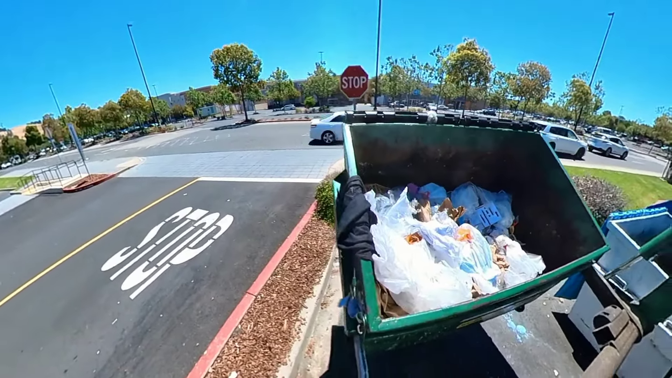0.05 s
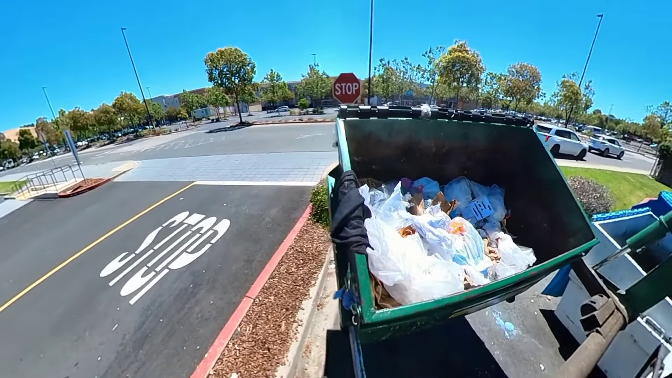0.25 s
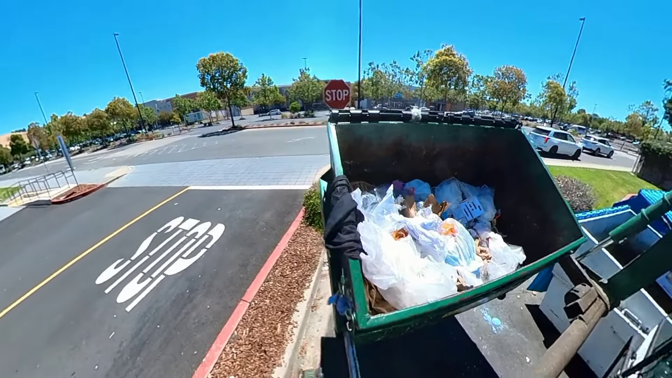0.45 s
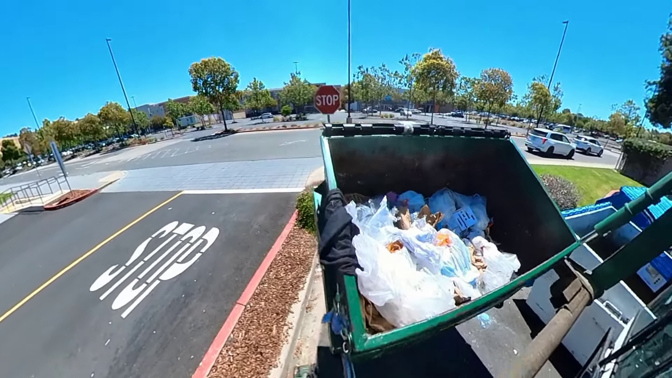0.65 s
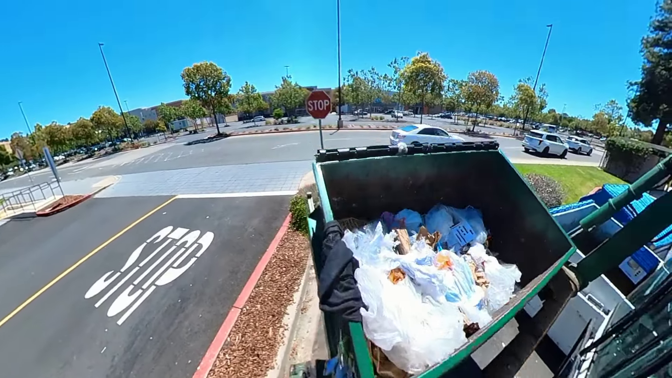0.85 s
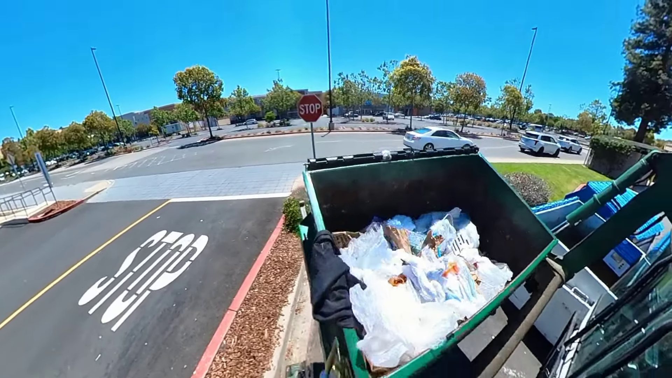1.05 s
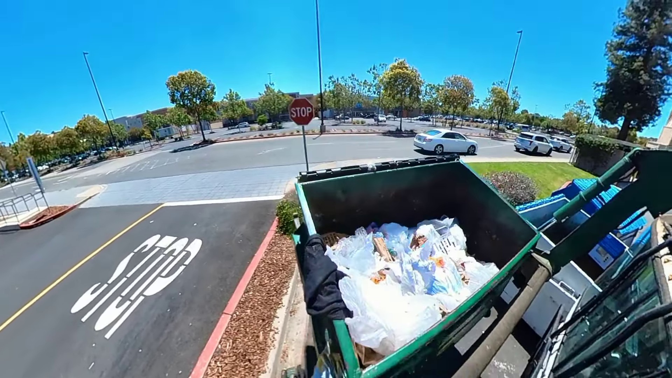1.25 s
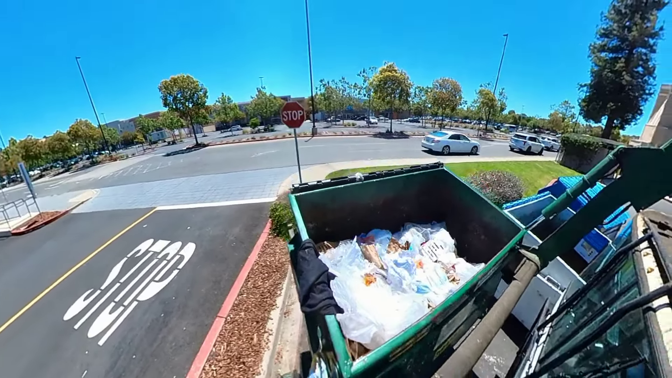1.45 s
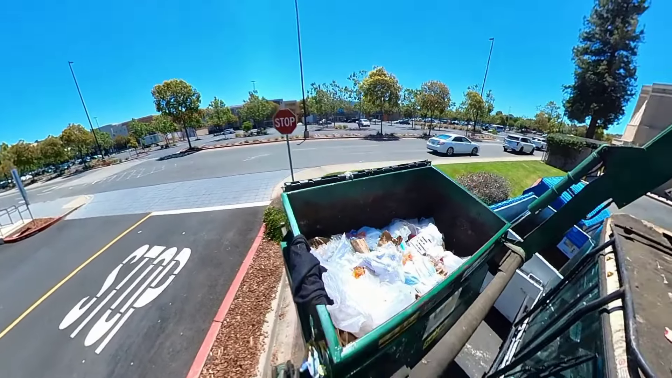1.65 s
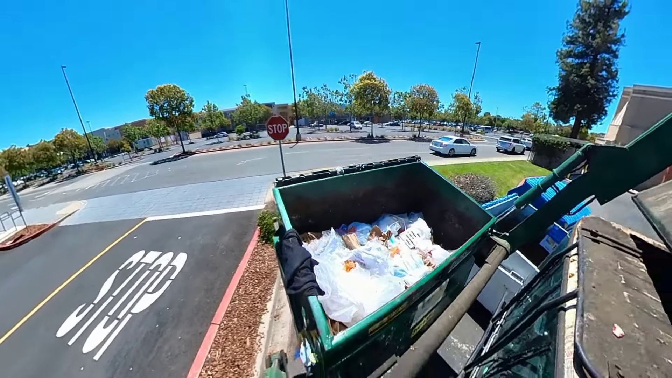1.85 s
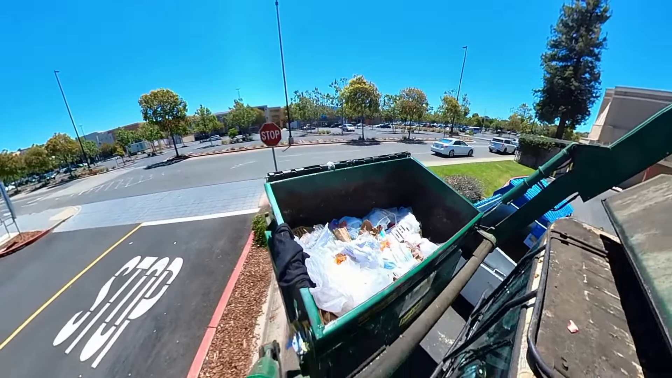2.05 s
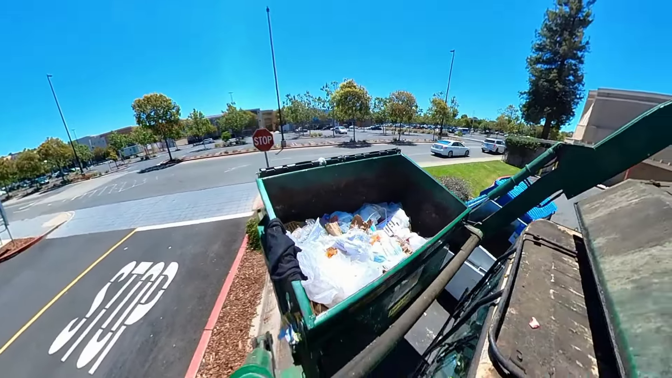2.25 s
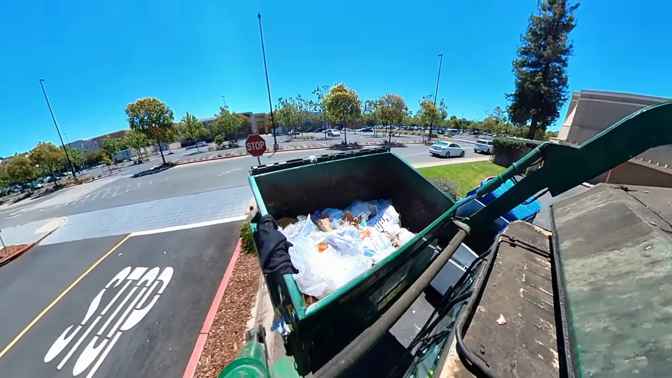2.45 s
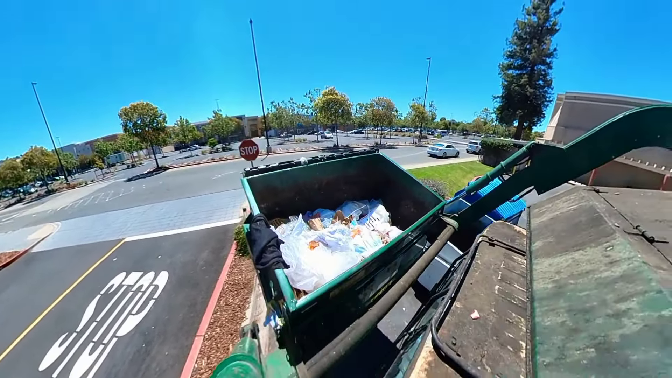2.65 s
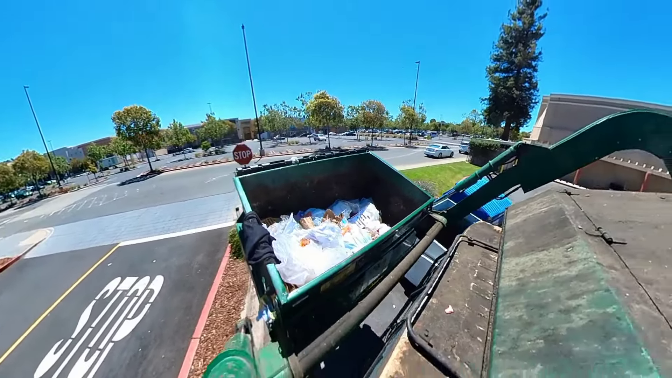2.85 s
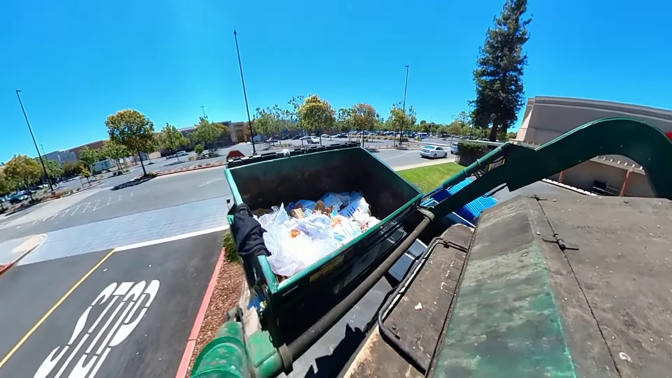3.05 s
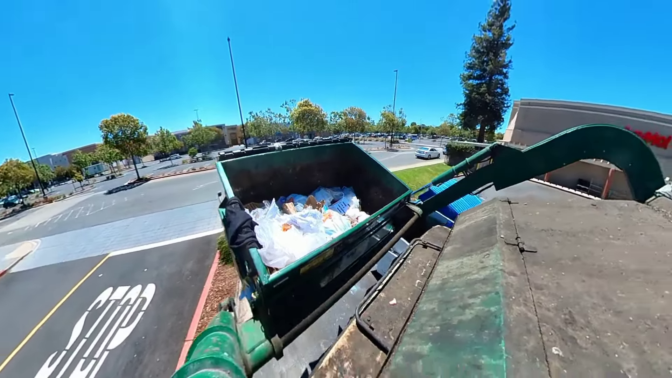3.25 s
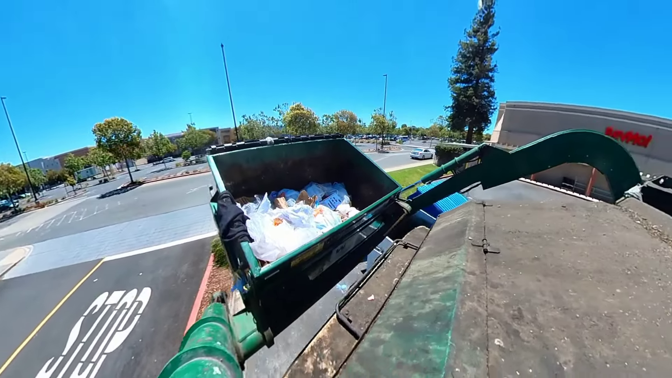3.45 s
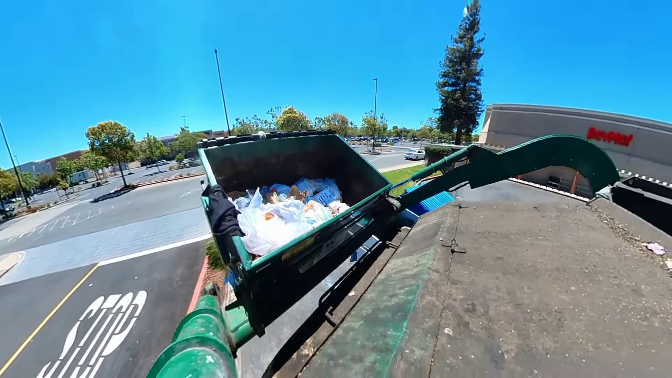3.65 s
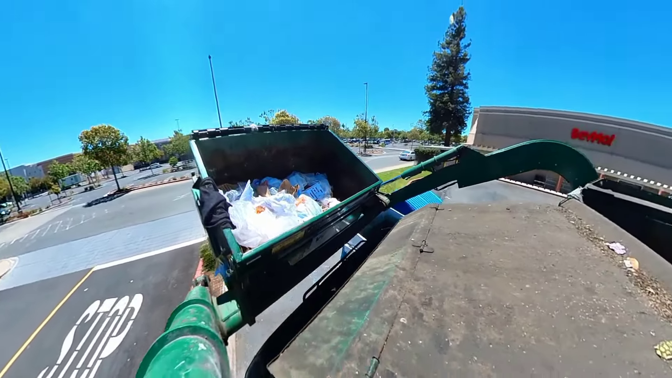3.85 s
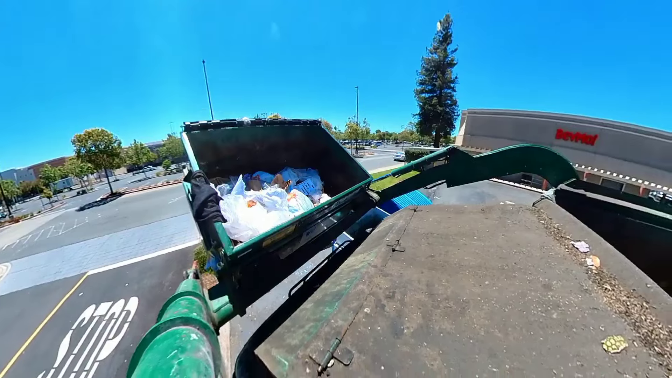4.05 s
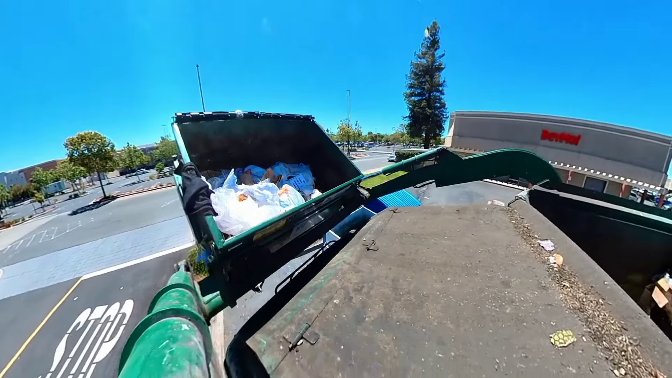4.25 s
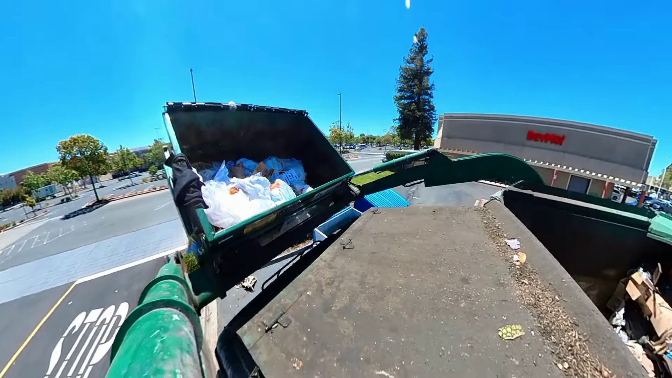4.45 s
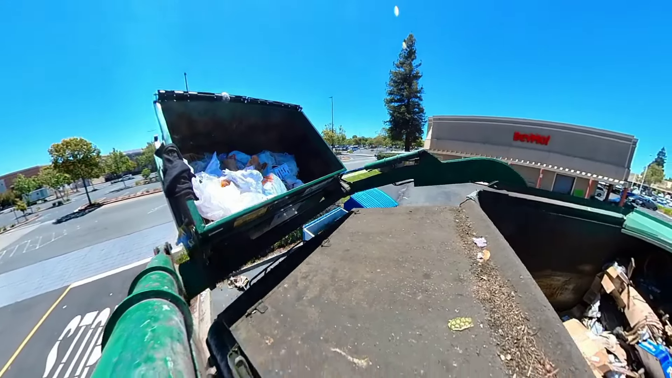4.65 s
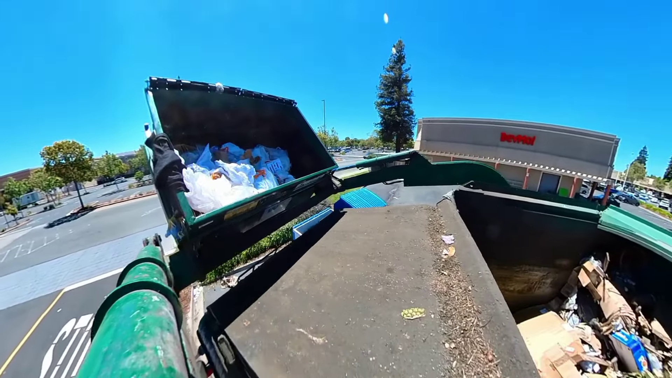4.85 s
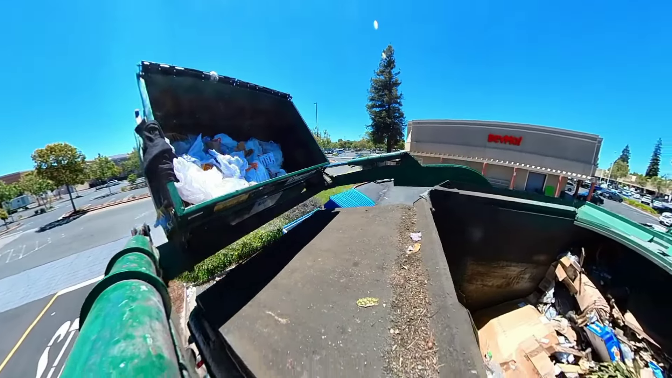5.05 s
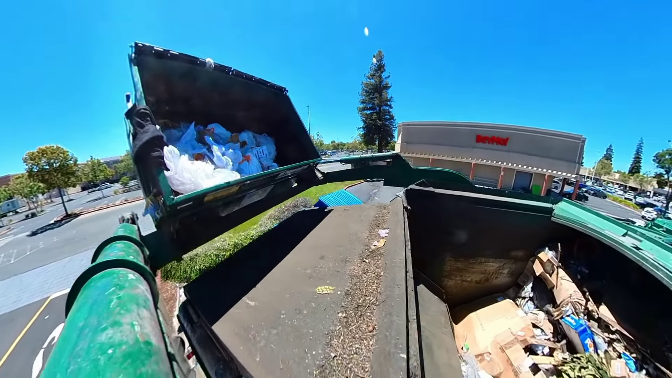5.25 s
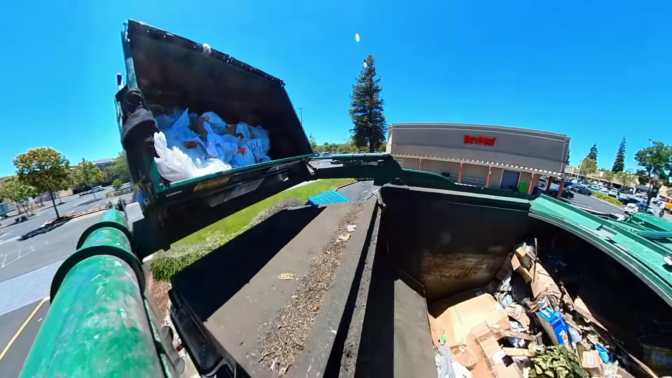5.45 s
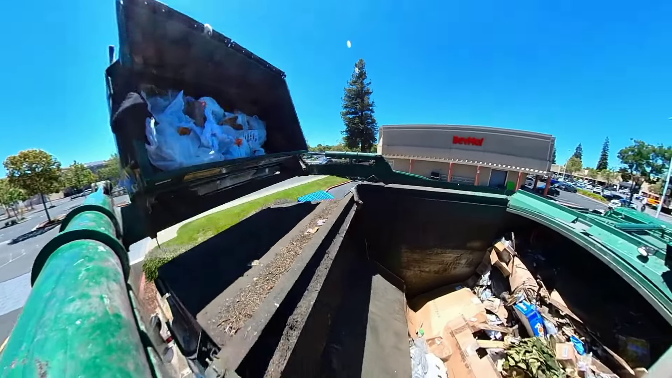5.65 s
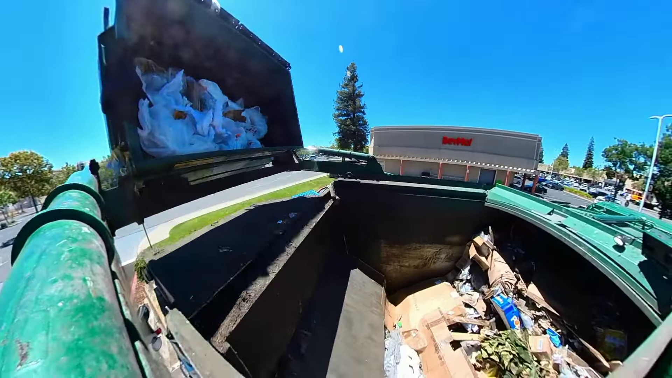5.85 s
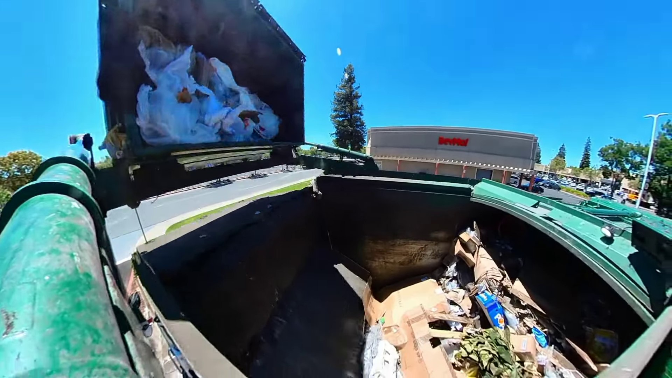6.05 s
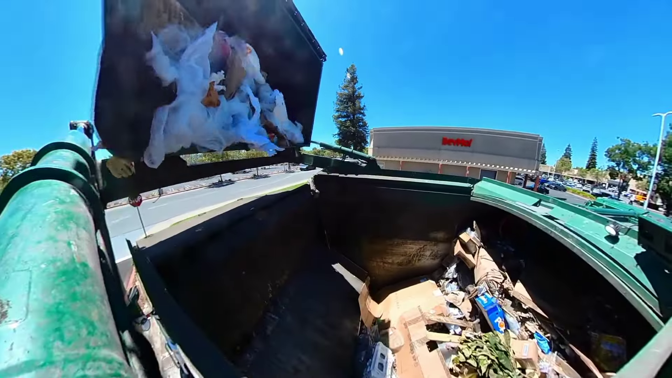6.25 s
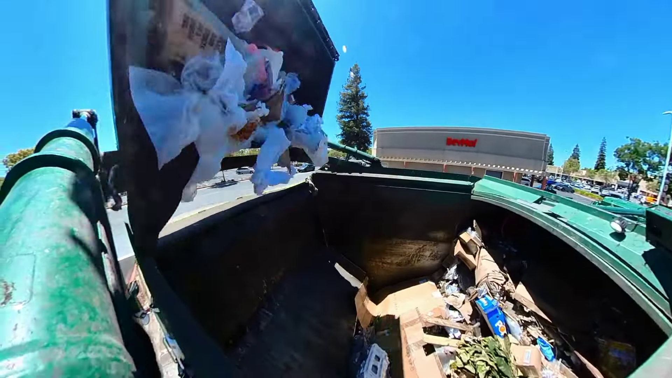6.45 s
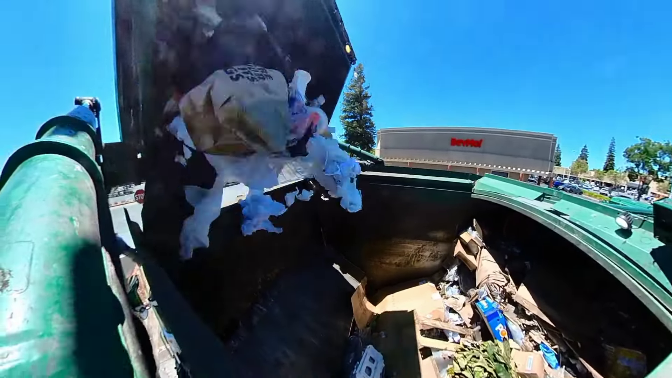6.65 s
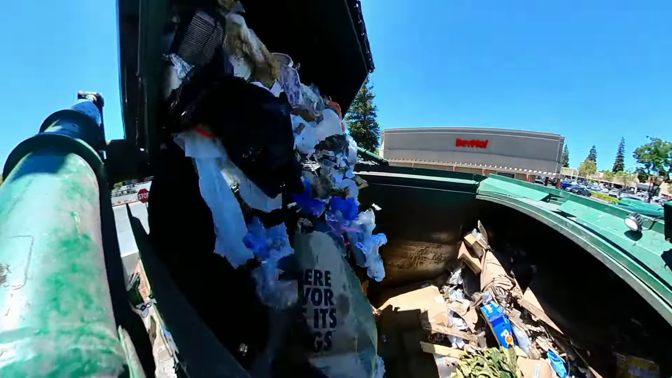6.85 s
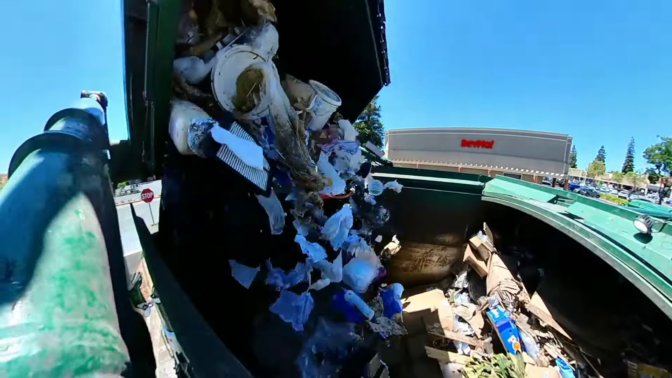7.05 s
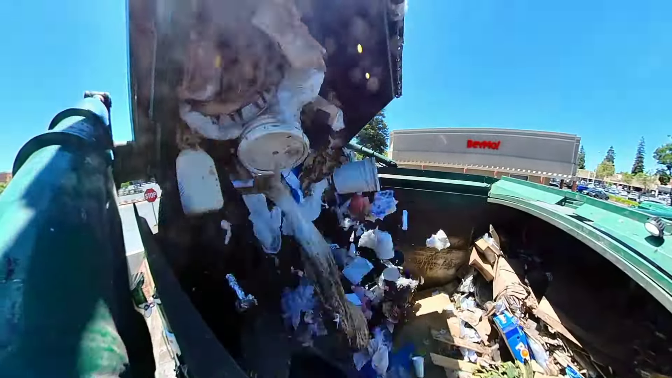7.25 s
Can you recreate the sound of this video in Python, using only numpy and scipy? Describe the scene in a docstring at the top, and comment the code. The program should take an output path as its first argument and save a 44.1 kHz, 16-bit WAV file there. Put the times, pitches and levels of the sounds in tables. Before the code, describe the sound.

A garbage truck's diesel drones and hisses as a steel dumpster clanks on its forks, rises, then booms and clatters its trash into the hopper.

```python
"""A diesel drones and hisses on a front-loading garbage truck, with a few squeaks, heard from its roof.
Exhaust, pump and fan tones follow one turning shaft; filtered noise makes the rumble, roar, air and oil hiss.
Clanks and bangs of a steel dumpster, and a few faint bumps in the drone, are bursts of ringing chatter.
Then it tips: lids rattle, panels and bags boom into the hopper as gliding or wobbling notes,
the sound turns muffled and hollow for half a second, and a hard container clinks."""
import sys
import numpy as np
from scipy import signal
from scipy.fft import rfft, irfft, next_fast_len
from scipy.io import wavfile

SR = 44100
rng = np.random.default_rng(int(sys.argv[2]) if len(sys.argv) > 2 else 0)


def to_wav(s):
    """Save 16-bit WAV."""
    ch = np.atleast_2d(s).T  # columns
    pcm = np.round(np.clip(ch, -1, 1) * 32767)  # PCM
    wavfile.write(sys.argv[1], SR, pcm.astype(np.int16))


N = 321914
TIME = np.arange(N) / SR
# Throughout, t60 is the time a sound takes to fade by 60 dB.


def amp(db):
    """Turns decibels into a plain multiplier."""
    return 10 ** (np.asarray(db) / 20)


def unit(x):
    """Scales a sound to an rms (average strength) of 1."""
    return x / np.sqrt(np.mean(x ** 2) + 1e-20)


def curves(rows):
    """Draws each column of a timed table as a curve with a value at every sample."""
    s, *columns = np.transpose(rows)
    return [np.interp(TIME, s, column) for column in columns]


def read(points, hz):
    """Reads a spectrum table at the given frequencies, joining its points on a log pitch scale."""
    f, value = np.transpose(points)
    return np.interp(np.log(hz + 1), np.log(f), value)


def colour(x, points):
    """Shapes a sound's balance of pitches with a spectrum table, then scales it to rms 1."""
    size = next_fast_len(len(x))
    gain = amp(read(points, np.fft.rfftfreq(size, 1 / SR)))
    return unit(irfft(rfft(x, size) * gain, size)[:len(x)])


def band(x, lo_hz, hi_hz, order=2):
    """Keeps mainly the pitches between two limits."""
    sos = signal.butter(order, [lo_hz, min(hi_hz, SR / 2 - 1)], "band", fs=SR, output="sos")
    return signal.sosfilt(sos, x)


def wander(hz):
    """Makes a smooth random curve of rms 1 that changes up to about hz times a second."""
    step = int(np.clip(SR / hz / 16, 1, 128))  # drawn at every step-th sample, then joined up
    size = next_fast_len(N // step + 2)
    f = np.fft.rfftfreq(size, step / SR)
    slow = irfft(rfft(rng.standard_normal(size)) / (1 + (f / hz) ** 4), size)
    return unit(np.interp(np.arange(N) / step, np.arange(size), slow))


def add(mix, s, sound):
    """Mixes a sound in at time s."""
    part = mix[max(round(s * SR), 0):][:len(sound)]
    part += sound[:len(part)]


def panels(x, t60, wet_db):
    """Adds the dense, fading echoes that bounce between the truck's steel panels."""
    t = np.arange(SR // 3) / SR
    echo_here = rng.random(len(t)) < 2500 / SR  # about 2500 echoes a second
    taps = rng.standard_normal(len(t)) * echo_here * amp(-60 * t / t60)
    echoes = signal.fftconvolve(x, taps / np.linalg.norm(taps))[:N]
    return x + amp(wet_db) * echoes


def ringing(modes, t):
    """A steel part's answer to one contact: fading tones, wider ones fading faster, with energy 1."""
    ring = 0
    for hz, width, db in modes:
        ring = ring + amp(db) * width * np.exp(-np.pi * width * t) * np.cos(2 * np.pi * hz * t)
    return ring / np.linalg.norm(ring)


def rattle(t, t60, hold=0., spread=0.75):
    """A hard first contact; loose parts chatter for the hold time, then die away."""
    # a larger spread makes the shower of contacts more uneven
    shower = rng.standard_normal(len(t)) * np.exp(spread * rng.standard_normal(len(t)))
    contact = 1 + 0.44 * np.exp(-t / 0.0046)
    return unit(shower) * contact * amp(-60 * np.maximum(t - hold, 0) / t60)


# How fast the engine shaft turns: (time [s], speed [turns per second])
SHAFT_SPEED = [(0.0, 24.2), (0.25, 23.4), (0.72, 26.0), (1.0, 25.5), (1.42, 30.8), (1.65, 31.8),
               (1.9, 29.8), (2.17, 28.4), (2.55, 30.4), (2.8, 33.1), (3.02, 36.3), (3.3, 35.6),
               (3.63, 34.6), (4.2, 36.4), (5.0, 38.3), (5.55, 39.2), (5.97, 40.6), (6.3, 39.9)]


def shaft():
    """One shaft drives the machines; adding up its speed counts the turns so far."""
    speed, = curves(SHAFT_SPEED)
    return speed, np.cumsum(speed) / SR


RELEASE_S, TONE_FADE_S, ROAR_FADE_S = 6.263, 0.19, 0.4
TONE_DROP_DB, ROAR_DROP_DB = -17, -11


def released(fade_s):
    """0 under throttle; rises to 1 once it is let go as the arms reach the top."""
    return np.clip((TIME - RELEASE_S) / fade_s, 0, 1)


ROAR_DB, ROAR_PER_LOAD = -28.5, 0.71  # level at load 0, and growth [dB per dB of load]
# How hard the hydraulics work; also sets the roar, fan and hiss: (time [s], level [dB])
HYDRAULIC_LOAD = [(0, -5), (.3, -0.5), (.8, 4), (1.1, 1.5), (1.4, -0.5), (1.65, -0.5), (2.4, 0.5),
                  (2.8, -4), (3.08, 3), (3.55, -1.5), (4.1, 2), (5.55, 2), (5.95, -2.5), (6.25, 1),
                  (6.7, 4), (6.8, -1.5)]


def roar_level():
    """The engine's roar in dB: it follows the load and sinks when the throttle is let go."""
    return ROAR_DB + ROAR_PER_LOAD * curves(HYDRAULIC_LOAD)[0] + ROAR_DROP_DB * released(ROAR_FADE_S)


TONE_WAVER_DB, TONE_WAVER_HZ, TONE_JITTER_RAD = 1.7, 7, .07


def tone(turns, multiple):
    """A slightly unsteady tone locked to the shaft, at about rms 1."""
    phase = 2 * np.pi * (multiple * turns + rng.random()) + TONE_JITTER_RAD * wander(TONE_WAVER_HZ)
    return amp(TONE_WAVER_DB * wander(TONE_WAVER_HZ)) * np.sqrt(2) * np.sin(phase)


def resonance_gain(hz, modes):
    """How strongly a set of resonances passes a tone at pitch hz: most at their centres."""
    power = 0
    for centre, width, db in modes:
        power = power + (amp(db) / (1 + (2 * (hz - centre) / width) ** 2)) ** 2
    return np.sqrt(power)


# what each machine repeats, in multiples of the shaft speed
EXHAUST_MULTIPLES, PUMP_MULTIPLES, FAN_MULTIPLES = (1.5, 3), (5.25, 10.5), (6.15,)
FAN_PER_LOAD = -0.65  # dB per dB: the fan tone stands out when the load eases
DIP_S, DIP_HALF_LENGTH_S, DIP_DB = 1.17, 0.37, -9.5
# Resonances the machines' tones swell in: (centre [Hz], width [Hz], peak level [dB])
EXHAUST_RESONANCES = [(37, 9, -38), (58.2, 5.9, -30.5), (70.7, 7, -31), (78.1, 4.9, -28), (87.2, 20, -33),
                      (107.6, 21, -32.5)]
PUMP_RESONANCES = [(125, 18, -35.5), (157.3, 25, -28), (192.7, 11, -28.5), (209, 14, -28.5),
                   (274, 33, -46.5), (372.3, 30, -32.5)]
FAN_RESONANCES = [(152, 36, -30.5), (188, 12, -31), (203.8, 26, -24), (240, 22, -29), (249.5, 12, -26.5)]
# Faint whines of gears and pump: (multiple of shaft speed [1], level against trimmed roar [dB])
GEAR_WHINES = [(2.25, -12.5), (3.75, -7), (12.3, -16.5), (15.75, -18), (18.45, -18.5), (19.6, -20.5),
               (21, -25), (61.5, -30), (68.25, -28)]


def drone(speed, turns):
    """Exhaust, pump and fan tones glide with the shaft through their resonances; gears whine faintly."""
    def machine(multiples, modes):
        """Each tone gets louder as its pitch nears a resonance."""
        return sum(resonance_gain(k * speed, modes) * tone(turns, k) for k in multiples)
    exhaust = machine(EXHAUST_MULTIPLES, EXHAUST_RESONANCES)
    pump = machine(PUMP_MULTIPLES, PUMP_RESONANCES)
    fan = machine(FAN_MULTIPLES, FAN_RESONANCES) * amp(FAN_PER_LOAD * curves(HYDRAULIC_LOAD)[0])
    whine = amp(roar_level() - 2.5) * sum(amp(db) * tone(turns, k) for k, db in GEAR_WHINES)
    # the tones dip briefly while the bin jolts on the forks
    dip = np.exp(-((TIME - DIP_S) / DIP_HALF_LENGTH_S) ** 4)
    return (exhaust + pump + fan + whine) * amp(DIP_DB * dip + TONE_DROP_DB * released(TONE_FADE_S))


FIRINGS_PER_TURN = 3
RUMBLE_SWAY_DB, RUMBLE_SWAY_HZ = 2, 7
# Low rumble under throttle, and thinner once let go: (pitch [Hz], relative level [dB per Hz])
LOADED_RUMBLE = [(15, -13.5), (30, -5), (45, -1.5), (80, 2.5), (130, 4.5), (200, -6), (400, -44.5)]
THIN_RUMBLE = [(15, -6), (35, 0), (55, -2), (90, -0.5), (140, -2.5), (200, -8), (400, -38.5)]
THIN_RUMBLE_DB = -3  # against the loaded rumble
# How loud the low rumble is, before its sway: (time [s], level [dB])
RUMBLE_LOUDNESS = [(0, -36), (.8, -41), (1.25, -29), (1.5, -33.5), (1.8, -40), (2.3, -39), (3.6, -39.5),
                   (4.4, -34), (5.5, -31.5), (6.2, -39.5), (6.6, -35), (7.1, -31.5)]
# Balance of pitches in the roar: (pitch [Hz], relative level [dB per Hz])
ROAR_SPECTRUM = [(70, -15), (140, 2), (250, 0), (330, -2.5), (480, -4.5), (680, -10.5), (850, -14),
                 (1200, -20), (1700, -23), (3000, -29), (7000, -64.5)]


def engine(turns):
    """Each firing puffs gas and knocks on the block; part of the clatter repeats every two turns."""
    firing = FIRINGS_PER_TURN * turns
    strength = amp(1.7 * rng.standard_normal(N // 100))[firing.astype(int)]  # one per firing
    puffs = 3.2 + strength * np.exp(-(firing % 1) / 0.25)
    cycle = rng.standard_normal(2048)
    valves = np.interp(turns / 2, np.arange(len(cycle)) / len(cycle), cycle, period=1)
    clatter = rng.standard_normal(N) + .55 * valves
    surge_db = .6 * wander(10)
    roar = colour(clatter * puffs, ROAR_SPECTRUM) * amp(roar_level() + surge_db)
    noise, let_go = rng.standard_normal(N), released(TONE_FADE_S)
    loaded = (1 - let_go) * colour(noise, LOADED_RUMBLE)
    thin = let_go * amp(THIN_RUMBLE_DB) * colour(noise, THIN_RUMBLE)
    rumble_db = curves(RUMBLE_LOUDNESS)[0] + RUMBLE_SWAY_DB * wander(RUMBLE_SWAY_HZ)
    return (loaded + thin) * amp(rumble_db) + roar


WASH_LO_HZ, WASH_HI_HZ = 231, 331
# Air churned by the fan, before the throttle drop: (time [s], level [dB])
FAN_AIR = [(0, -46), (1.2, -43), (1.7, -32.5), (2.7, -33), (3.2, -37.5), (4.2, -41.5), (5.2, -37),
           (6.2, -38)]


def fan_wash():
    """The cooling fan churns air in a low band, which sinks when the throttle is let go."""
    churn = unit(band(rng.standard_normal(N), WASH_LO_HZ, WASH_HI_HZ))
    return churn * amp(curves(FAN_AIR)[0] + TONE_DROP_DB * released(TONE_FADE_S))


OIL_DB = -47  # at load 0
# Balance of pitches in the oil's hiss: (pitch [Hz], relative level [dB per Hz])
OIL_SPECTRUM = [(500, -15), (1300, 0.5), (2100, 1), (2800, 0.5), (3600, 1.5), (4800, 0.5), (5900, -3),
                (7000, -9), (8000, -12), (9500, -24.5)]


def hydraulics(turns):
    """Oil hisses through valves in shifting patches, pulsing with the engine and ringing in steel pipes."""
    load_db, = curves(HYDRAULIC_LOAD)
    pulse = 1 + 0.05 * np.cos(2 * np.pi * FIRINGS_PER_TURN * turns)
    piped = panels(rng.standard_normal(N) * pulse, t60=0.027, wet_db=-6.5)
    z = signal.stft(piped, nperseg=512)[2]
    # smooth random patches over pitch and time make parts of the hiss louder or softer
    blur = np.outer(np.hanning(8), np.hanning(10))
    patches = unit(signal.fftconvolve(rng.standard_normal(z.shape), blur, "same"))
    hiss = signal.istft(z * amp(2.3 * patches), nperseg=512)[1][:N]
    flutter_db = .7 * wander(18)
    return colour(hiss, OIL_SPECTRUM) * amp(OIL_DB + load_db + flutter_db)


VALVE_LO_HZ, VALVE_HI_HZ = 5750, 6850
# The valve sings up as the arms near the top: (time [s], level [dB])
VALVE_LEVEL = [(2.8, -76.5), (3.4, -62.5), (4.4, -63), (5.0, -59), (5.7, -56.5), (5.95, -63), (6.25, -56),
               (6.7, -53.5)]


def valve():
    """Oil squeezes through a valve in a narrow, ringing hiss, very faint at first."""
    jet = panels(rng.standard_normal(N), t60=.2, wet_db=-0.5)
    return unit(band(jet, VALVE_LO_HZ, VALVE_HI_HZ, order=3)) * amp(curves(VALVE_LEVEL)[0])


SQUEAK_FLUTTER_DB, SQUEAK_FLUTTER_HZ = 2, 45
# Squeaks, whistles and a long, faint rising whine: (time [s], length [s], first pitch [Hz],
# last pitch [Hz], level before fades and echoes [dB], unsteadiness [share of the pitch])
SQUEAK_NOTES = [(0.047, 0.17, 4400, 3980, -45, 0.08), (0.048, 0.14, 5320, 5450, -47.5, 0.06),
                (0.45, 0.42, 485, 505, -37, .05), (1.121, 0.009, 6820, 6670, -38, .012),
                (1.126, 0.015, 4900, 4770, -25.5, .022), (1.135, 0.028, 4300, 4260, -35, 0.025),
                (1.199, 0.008, 3150, 3250, -38, .03), (1.2, 0.009, 3760, 3800, -39, .03),
                (1.241, 0.011, 6060, 6020, -27.5, .006), (1.256, 0.019, 5950, 5930, -24.5, .012),
                (1.274, 0.025, 5920, 5840, -30, .025), (1.28, 0.012, 5450, 5390, -22.5, 0.034),
                (1.292, .009, 5400, 5270, -31.5, 0.034), (1.504, 0.1, 4340, 4250, -54, .012),
                (1.817, 0.058, 4150, 4050, -53, .012), (2.147, 0.086, 2385, 2380, -51, .004),
                (2.33, 0.13, 2985, 3030, -52, .004), (2.466, 0.09, 2045, 2050, -50, .004),
                (2.65, 0.088, 1830, 1880, -48, .004), (4.782, 0.86, 5360, 5940, -57.5, 0.021),
                (5.202, 0.14, 2630, 2640, -50.5, 0.006)]


def squeaks():
    """Squeaks, whistles and a long, faint rising whine: unsteady gliding tones that fade in and out."""
    out = np.zeros(N)
    for s, length, first_hz, last_hz, db, unsteady in SQUEAK_NOTES:
        size = int(length * SR)
        hz = np.linspace(first_hz, last_hz, size) * (1 + unsteady * wander(500)[:size])
        flutter = unit(amp(SQUEAK_FLUTTER_DB * wander(SQUEAK_FLUTTER_HZ)[:size]))
        glide = np.sqrt(2) * np.sin(2 * np.pi * np.cumsum(hz) / SR)
        fade = signal.windows.tukey(size, .5)
        add(out, s, amp(db) * flutter * glide * fade)
    return panels(out, t60=.1, wet_db=-11)


BOUNCES_PER_S, BOUNCE_S, BOUNCE_SIZE = 200, .0015, 1.2


def bounces(t):
    """A firm first contact, then uneven renewed ones that break a rattle into clumps."""
    contacts = (rng.random(len(t)) < BOUNCES_PER_S / SR) * rng.uniform(.4, 1.1, len(t))
    contacts[0] = 1
    return 1 + BOUNCE_SIZE * signal.lfilter([1], [1, -np.exp(-1 / (BOUNCE_S * SR))], contacts)


# stronger clangs ring longer: t60 at a clang of HARD_CLANG_DB, and its growth [dB per dB]
CLANK_T60_S, HARD_CLANG_DB, RING_GROWTH = 0.43, -19, 0.54
STRIKE_S, STRIKE_DB = 0.00013, 7  # the first push; level against its clang
# Clanks and bangs, with a few faint bumps in the drone; levels before a shared trim and echoes:
# (time [s], thud level [dB], clang level [dB], crash level [dB], chatter [s])
CLANKS_AND_BUMPS = [(0.822, -45, -51, -27, 0.017), (0.824, -17.5, -35, -30, 0.0036),
                    (0.8387, -27, -43, -32.5, .006), (0.8962, -24.5, -36, -34, 0.028),
                    (0.933, -21, -22.5, -21.5, 0.007), (0.9461, -30, -29, -31, 0.0055),
                    (0.957, -26, -34, -32, .002), (1.004, -39, -43, -42, .002),
                    (1.10, -47, -42, -33, 0.012), (1.1259, -35, -36, -29, 0.004),
                    (1.139, -44, -46, -31, 0.0027), (1.155, -48, -27.5, -54, 0.0024),
                    (1.203, -43, -49, -47, .003), (1.25, -24.5, -38, -38, 0.019),
                    (1.284, -26.5, -27.5, -32.5, 0.02), (1.633, -30, -42, -49, 0.014),
                    (1.804, -40, -39, -49, 0.0036), (1.845, -40, -41, -51, .006),
                    (2.35, -28, -44, -54, 0.015), (2.405, -32.5, -48, -56, .004),
                    (3.073, -23.5, -40, -51.5, .004), (3.885, -37, -45.5, -43, 0.004),
                    (4.854, -46, -43, -43.5, .004), (6.531, -40, -37.5, -55, .002),
                    (6.549, -31.5, -34.5, -30.5, 0.021), (6.6007, -17, -22, -18.5, 0.008),
                    (6.655, -30.5, -35, -33, 0.027), (6.683, -27.5, -38, -48, .003)]
# What the bin's walls ring with: (pitch [Hz], width [Hz], relative level [dB])
BIN_WALLS = [(458, 15, -7.5), (674, 40, 6), (735, 160, -2.5), (966, 14, -0.5), (1178, 37, 2.5),
             (1335, 18, -2.5), (1630, 9.9, -5), (1850, 12, -9), (2250, 18, -10.5), (2900, 22, -12.5),
             (3520, 40, -17.5), (3680, 37, -16), (5170, 50, -18), (6450, 35, -18)]
# Balance of pitches in the bright crash: (pitch [Hz], relative level [dB per Hz])
CRASH_SPECTRUM = [(700, -40), (1700, -5.5), (3000, 3), (4200, 0.5), (5500, -0.5), (7200, -3), (8200, -9),
                  (9500, -15)]


def clanks():
    """Clanks, bangs and a few faint bumps: each is a short push and a chatter through the same wall tones."""
    t, out = np.arange(SR // 2) / SR, np.zeros(N)
    walls = ringing(BIN_WALLS, t)
    attack = t < .02  # each part's level is set over its first 20 ms
    strike = (1 - t / STRIKE_S) * np.exp(-t / STRIKE_S)
    for s, thud_db, clang_db, crash_db, hold in CLANKS_AND_BUMPS:
        t60 = CLANK_T60_S * amp(RING_GROWTH * (clang_db - HARD_CLANG_DB))
        chatter = rattle(t, t60, hold, spread=0.56) * bounces(t)
        ring = signal.fftconvolve(chatter, walls)[:len(t)]
        thud = band(rattle(t, t60 * 0.63, hold, spread=0.12), 75, 520)
        clang = band(0.59 * ring + chatter, 620, 2100)
        crash = colour(chatter + 0.52 * ring, CRASH_SPECTRUM) * (1 - t / t[-1])
        add(out, s, amp(clang_db + STRIKE_DB) * strike)
        for part, db in (thud, thud_db), (clang, clang_db), (crash, crash_db):
            add(out, s, amp(db - 2.0) * part / part[attack].std())
    return panels(out, t60=0.13, wet_db=-7.5)


BOOM_WOBBLE_DEPTH_HZ, BOOM_WOBBLE_HZ = 3.5, 35
BEND_S = 0.00073  # how quickly a sharp start drops to the settled pitch


def boom(t, hz, swell, t60, bend_hz=0):
    """A panel's note swells, wobbles under the shifting load and dies; bend_hz starts it sharp."""
    wobble_hz = BOOM_WOBBLE_DEPTH_HZ * wander(BOOM_WOBBLE_HZ)[:len(t)]
    bend = bend_hz * BEND_S * (1 - np.exp(-t / BEND_S))
    cycles = hz * t + np.cumsum(wobble_hz) / SR + bend
    return np.sin(2 * np.pi * cycles) * (1 - np.exp(-t / swell)) * amp(-60 * t / t60)


def crunch(t, floor):
    """Loose contents settle on the hopper floor: a short rattle rings it."""
    return band(signal.fftconvolve(rattle(t, 0.1, 0.0051), floor)[:len(t)], 340, 2400)


BOOM_T60_S, BOOM_T60_PER_SWELL, BOOM_CRUNCH_DB = 0.15, 4.3, -30.5  # slow pushes boom longer
# a heavy bag stiffens the floor for an instant, so the thud starts high and drops
THUD_SWELL_S, THUD_T60_S, THUD_BEND_HZ = 0.00072, 0.063, 430
CAN_SWELL_S, CAN_BEND_HZ = 0.0011, 120
# The sliding load booms the big panels: (time [s], level before trim [dB], pitch [Hz], swell [s])
PANEL_BOOMS = [(6.308, -15.5, 198, 0.0024), (6.347, -17.5, 215, 0.0033), (6.372, -13, 201, 0.0011),
               (6.434, -15.5, 204, 0.0059), (6.64, -14, 255, 0.022), (6.743, -11.5, 204.4, 0.015),
               (6.794, -11, 198, 0.02), (6.873, -10, 190, 0.012), (6.937, -19, 209, 0.0044),
               (6.974, -19, 191, 0.0055), (7.004, -9, 198, 0.0066), (7.056, -19.5, 202.4, .004),
               (7.105, -18, 181.5, 0.0016)]
# Bags landing on the hopper floor, thud and slap before trims:
# (time [s], thud level [dB], thud pitch [Hz], slap level [dB], crunch level [dB])
BAG_LANDINGS = [(6.789, -35.5, 200, -44, -41), (6.881, -33.5, 200, -41, -45),
                (7.018, -14.5, 201.4, -44, -35), (7.0394, -6, 168.5, -14, -30), (7.077, -12, 218, -32, -26),
                (7.097, -29.5, 197, -25.5, -26)]
# Cans and tubs knocking inside the bags: (time [s], level [dB], pitch [Hz], t60 [s])
CAN_KNOCKS = [(7.078, -24, 460, 0.12), (7.076, -27, 2010, 0.046), (7.096, -34, 1055, 0.082),
              (7.098, -23.5, 1280, 0.1)]
# The floor's quick upper ringing: (pitch [Hz], width [Hz], relative level [dB])
HOPPER_FLOOR = [(98, 27, -9), (330, 60, 1), (486, 90, 3), (740, 63, -10.5), (1080, 70, -20.5),
                (1270, 81, -6.5), (2050, 220, -19)]


def hopper():
    """The load makes big panels boom; bags slap the floor, their contents crunch, and cans knock."""
    t, out = np.arange(SR // 2) / SR, np.zeros(N)
    floor = ringing(HOPPER_FLOOR, t)
    slap = band(floor / floor.max(), 60, 2200)
    for s, db, hz, swell in PANEL_BOOMS:
        note = boom(t, hz, swell, BOOM_T60_S + BOOM_T60_PER_SWELL * swell)
        add(out, s, amp(db + 5.0) * note)
        add(out, s, amp(db + BOOM_CRUNCH_DB) * crunch(t, floor))
    for s, thud_db, hz, slap_db, crunch_db in BAG_LANDINGS:
        thud = boom(t, hz, THUD_SWELL_S, THUD_T60_S, THUD_BEND_HZ)
        add(out, s, amp(thud_db + 6.5) * thud)
        add(out, s, amp(slap_db + 13.0) * slap)
        add(out, s, amp(crunch_db) * crunch(t, floor))
    for s, db, hz, t60 in CAN_KNOCKS:
        add(out, s, amp(db) * boom(t, hz, CAN_SWELL_S, t60, CAN_BEND_HZ))
    return out


LID_STRIKE = .35  # share of the ring that comes from the first contact
# Lids swinging open: (time [s], level before trim [dB], chatter [s], t60 [s])
LID_KNOCKS = [(6.345, -37, 0.01, 0.097), (6.367, -31.5, 0.0069, 0.098), (6.373, -37, 0.011, 0.12),
              (6.433, -33, 0.0099, 0.032)]
# What the lids ring with: (pitch [Hz], width [Hz], relative level [dB])
LID_RESONANCES = [(920, 19, 5.5), (1230, 12, 9), (1370, 70, 5), (1760, 40, -2), (2040, 57, -5.5),
                  (2370, 130, -13), (3080, 150, -17), (3300, 18, -7), (3600, 80, -13), (4370, 39, -25.5),
                  (5400, 76, -14)]


def lids():
    """The lids knock, ring and chatter on their hinge rod: a rattle sets their resonances going."""
    t, out = np.arange(SR // 3) / SR, np.zeros(N)
    modes = ringing(LID_RESONANCES, t)
    for s, db, hold, t60 in LID_KNOCKS:
        blow = rattle(t, t60, hold, spread=0.9)
        chatter_ring = signal.fftconvolve(blow, modes)[:len(t)]
        first_ring = np.linalg.norm(blow) * modes
        ring = (1 - LID_STRIKE) * chatter_ring + LID_STRIKE * first_ring
        knock = band(blow, 410, 6100, order=4)
        add(out, s, amp(db + 4.0) * (ring + 0.63 * knock))
    return out


# A hard container striking the hopper, levels before trims:
# (time [s], clink level [dB], damping t60 [s], scrape level [dB], rustle level [dB])
CONTAINER_HITS = [(7.237, -24.5, 0.044, -48, -49), (7.251, -25.5, 0.3, -25.5, -35)]
# What the container rings with, undamped: (pitch [Hz], relative level [dB], t60 [s])
CONTAINER_TONES = [(676, -13, 0.52), (810, -22, .3), (1388, 1, 0.46), (1480, -17, .1), (1960, -12, .45),
                   (2570, -20, .2), (3100, -18, .5)]


def container():
    """A hard container clinks among trash that damps its ring, with a scrape and a rustle of plastic."""
    t, out = np.arange(SR // 3) / SR, np.zeros(N)
    for s, clink_db, damped_t60, scrape_db, rustle_db in CONTAINER_HITS:
        ring = sum(amp(db - 60 * t / t60) * np.sin(2 * np.pi * hz * t) for hz, db, t60 in CONTAINER_TONES)
        scrape = band(rattle(t, 0.2, spread=0.37), 770, 3300, order=6)
        rustle = band(rattle(t, 0.1, 0.0099), 6140, 8500, order=5)
        add(out, s, amp(clink_db + 4.0 - 60 * t / damped_t60) * ring)
        add(out, s, amp(scrape_db + 6) * scrape)
        add(out, s, amp(rustle_db + 16.5) * rustle)
    return out


# only the lower treble differs between the ears
WIDE_LO_HZ, WIDE_HI_HZ, WIDE_DB, WIDE_T60_S = 2900, 5400, -8, .06


def scene():
    """All sources meet at one point on the roof; the lower treble is a little wide."""
    speed, turns = shaft()
    truck = drone(speed, turns) + engine(turns) + fan_wash() + hydraulics(turns) + valve()
    mix = truck + squeaks() + clanks() + hopper() + lids() + container()
    spread = panels(mix, t60=WIDE_T60_S, wet_db=WIDE_DB) - mix
    side = band(spread, WIDE_LO_HZ, WIDE_HI_HZ, order=10)
    return np.array([mix + side, mix - side])


def resonate(x, hz, width):
    """A resonance of gain 1 that follows the pitch curve hz: shift down, low-pass, shift back."""
    turn = np.exp(2j * np.pi * np.cumsum(hz) / SR)
    low_pass = signal.butter(2, width / 2, fs=SR, output="sos")
    return 2 * (turn * signal.sosfilt(low_pass, x / turn)).real


EDGE_HZ = 9400  # upper limit of the sound
HOLLOW_SWAY, HOLLOW_SWAY_HZ = .018, 18  # share of the pitch, and how fast it sways
# How muffled the sound is, before each pitch takes its share: (time [s], treble loss [dB])
MUFFLING = [(6.70, 13), (6.73, 18.5), (6.76, 56.5), (7.11, 46), (7.14, 40.5), (7.225, 39.5), (7.238, 25.5)]
# How much of that loss each pitch takes: (pitch [Hz], share [1])
MUFFLE_SHARE = [(400, 0.047), (800, 0.16), (1100, 0.16), (1400, 0.42), (1750, 0.49), (2450, 0.57),
                (3200, 0.69), (5500, 0.73), (7500, 0.7)]
# The microphone's fading treble: (pitch [Hz], level [dB])
MIC_TREBLE = [(7200, -0.5), (8000, -5), (8700, -11), (9400, -19.5)]
# Hollow tones at the most muffled moment: (pitch [Hz], width [Hz], level [dB])
HOLLOW_TONES = [(447, 60, -5), (670, 80, -9), (1070, 190, -6), (1430, 160, -15), (2040, 170, -20)]


def record(dry):
    """The treble closes to a hollow sound as the load slides; then microphone roll-off and band limit."""
    hz, t, z = signal.stft(dry, SR, nperseg=512, noverlap=384)
    loss_db = read(MUFFLE_SHARE, hz)[:, None] * np.interp(t, *np.transpose(MUFFLING))
    gain = amp(read(MIC_TREBLE, hz)[:, None] - loss_db)
    muffled = signal.istft(z * gain, SR, nperseg=512, noverlap=384)[1][:, :N]
    closed, = curves(MUFFLING)
    depth = ((closed - closed.min()) / np.ptp(closed)) ** 2  # 0 at least muffled, 1 at most
    hollow = np.zeros(N)
    for centre, width, db in HOLLOW_TONES:
        pitch_hz = centre * (1 + HOLLOW_SWAY * wander(HOLLOW_SWAY_HZ))
        hollow += amp(db) * resonate(dry.mean(0), pitch_hz, width)
    limit = signal.firwin(301, EDGE_HZ, window=("kaiser", 9), fs=SR)
    return signal.oaconvolve(muffled + depth * hollow, limit[None], "same")


dry = scene()
out = record(dry)
to_wav(out)
```